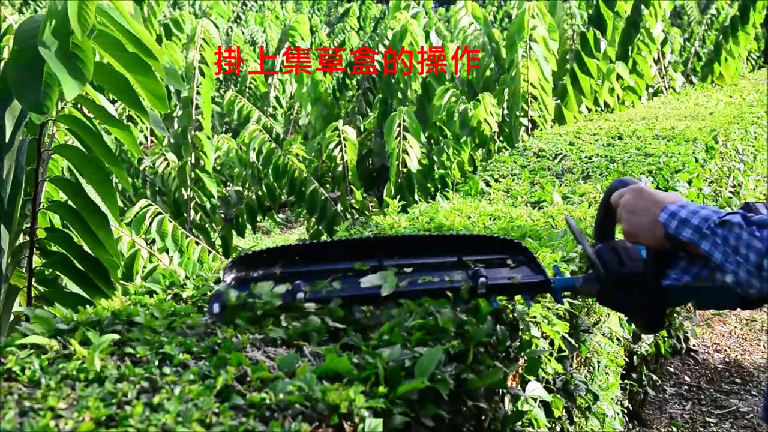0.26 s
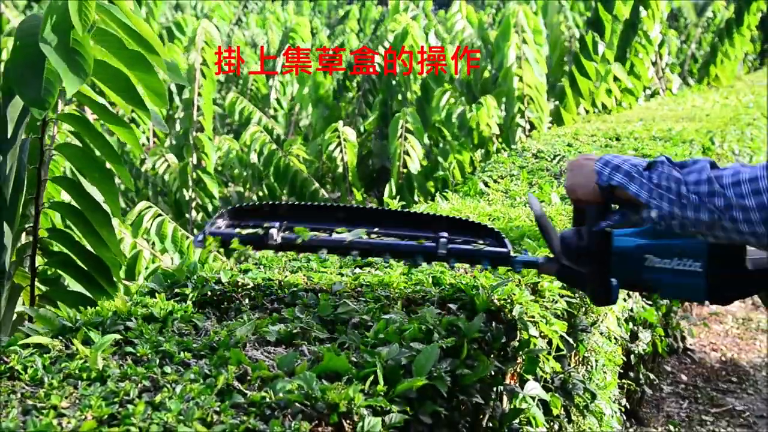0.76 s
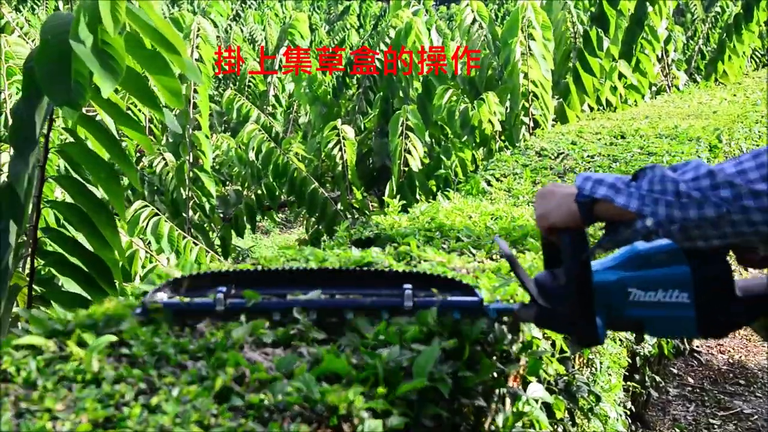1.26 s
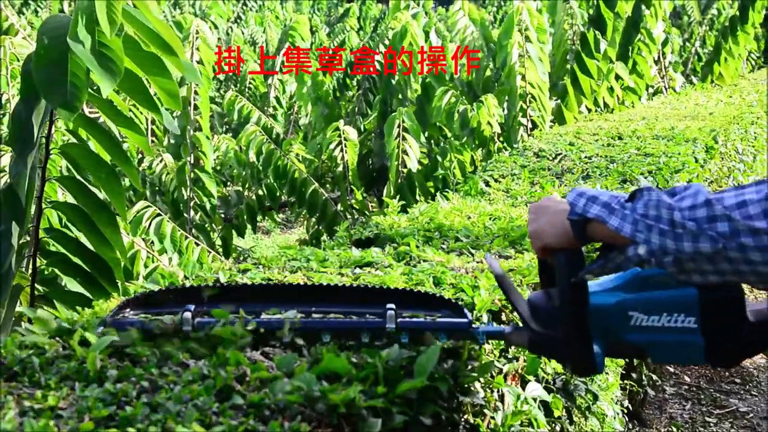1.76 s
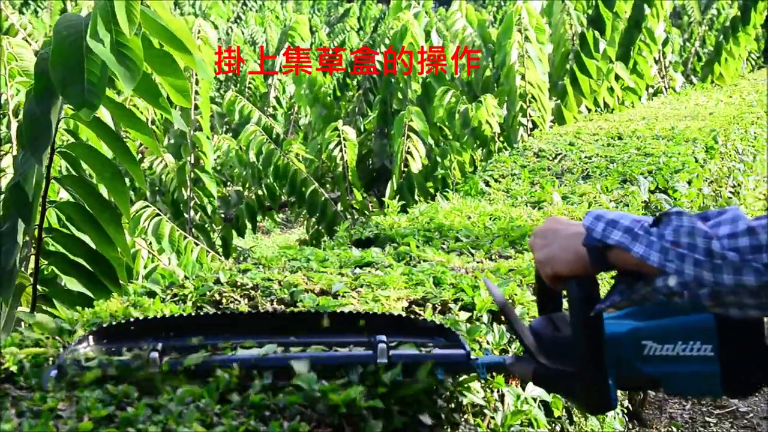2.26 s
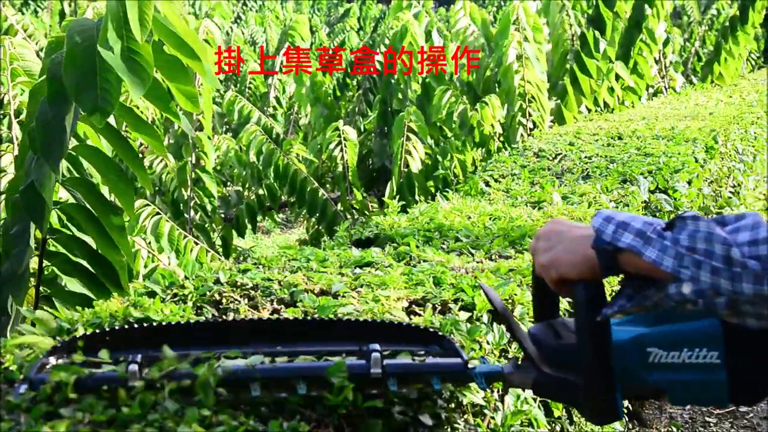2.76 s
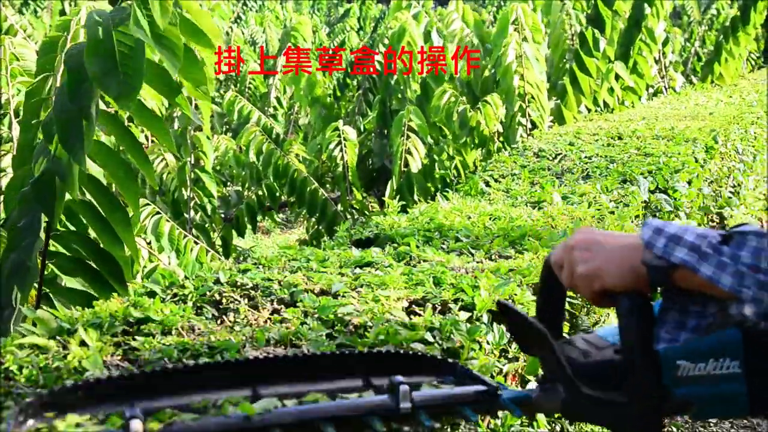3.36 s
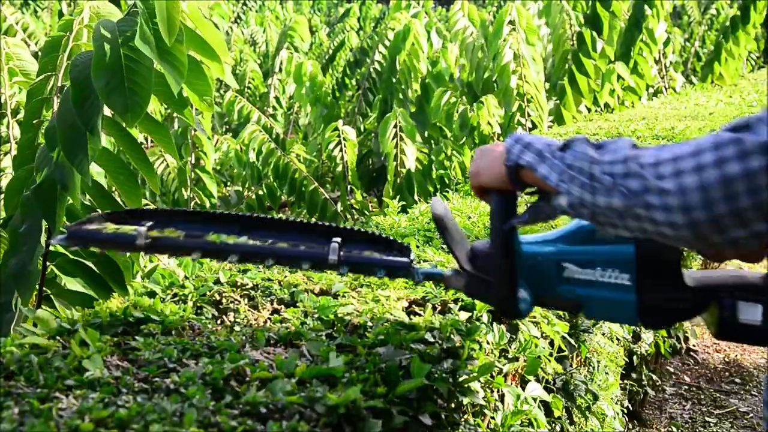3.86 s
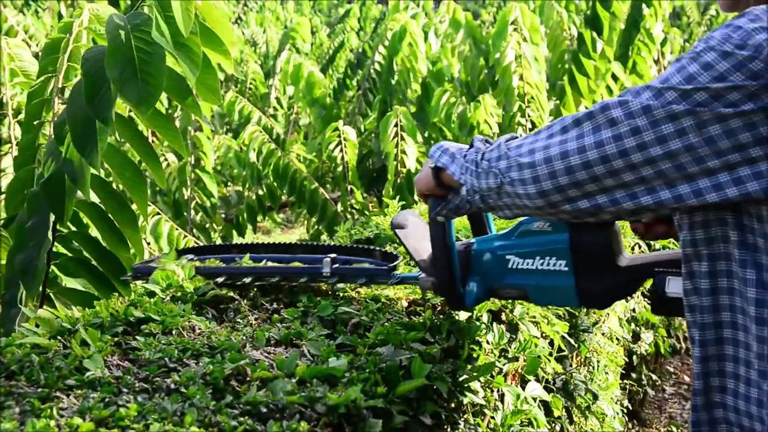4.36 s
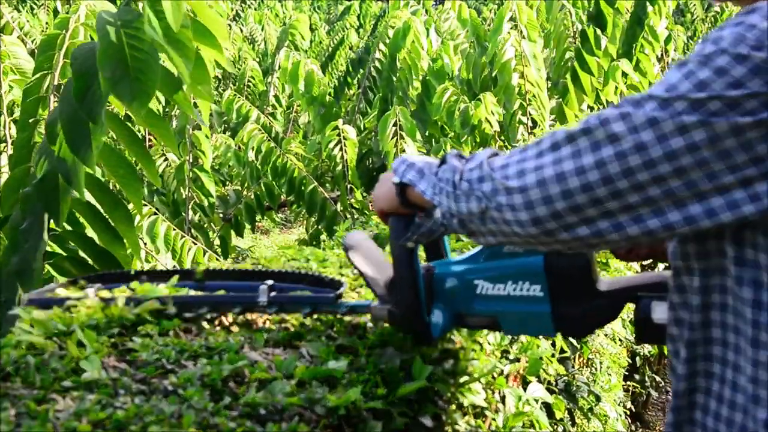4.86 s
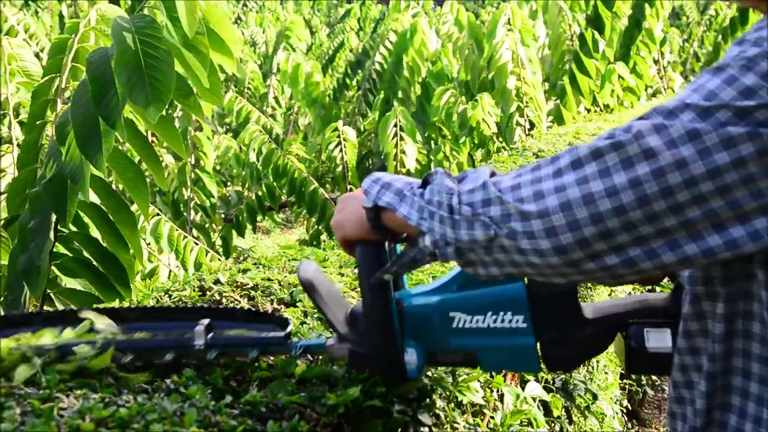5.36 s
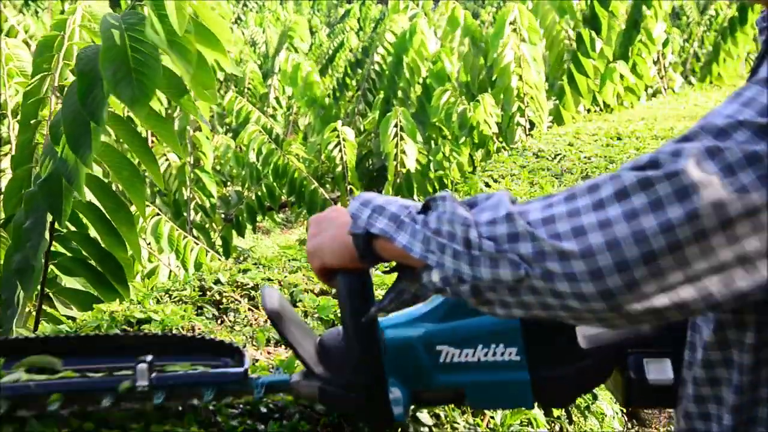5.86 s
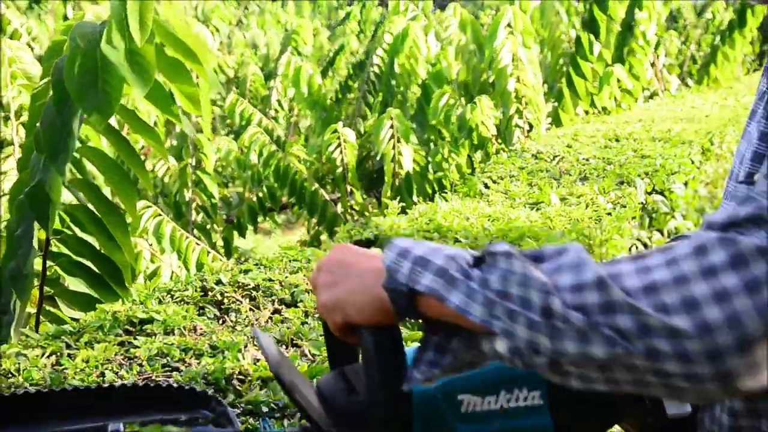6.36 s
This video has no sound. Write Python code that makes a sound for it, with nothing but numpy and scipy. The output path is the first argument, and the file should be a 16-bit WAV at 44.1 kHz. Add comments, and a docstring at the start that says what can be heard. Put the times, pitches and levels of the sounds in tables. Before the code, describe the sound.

After a few clinks, an electric hedge trimmer clatters close by, shearing leaves and snapping twigs, with one short pause midway.

```python
"""Cordless hedge trimmer at work

After a few clinks the trimmer spins up, cuts along a hedge, stops for half a second and cuts on.
Its blades knock at each reversal and rattle in between, gears whine, twigs snap and leaves rustle.
Further off, in a faint wash of open air, a slow single-cylinder engine thumps and gathers speed."""
import sys
import numpy as np
from scipy import signal
from scipy.fft import rfft, irfft
from scipy.io import wavfile
from scipy.ndimage import uniform_filter1d

SR = 44100
rng = np.random.default_rng(int(sys.argv[2]) if len(sys.argv) > 2 else 0)


def transcribe(u):
    """Save the signal u as a 16-bit wav file named by the first command-line argument.

    u: samples, shape (n,) or (channels, n), limited to [-1, 1]; the rate is SR.
    q: integer samples, one column per channel.
    """
    v = np.clip(np.atleast_2d(u).T, -1, 1)
    q = np.round(v * 32767).astype(np.int16)
    wavfile.write(sys.argv[1], SR, q)


N = 291501

# Tone of the blade bar and housing. Each row: frequency in Hz, gain in dB.
BODY_EQ = [(100, -25.5), (220, -24), (330, -17), (450, -13), (700, -13), (1000, -14), (1400, -6),
           (2000, -7), (3000, -4), (3700, -0.5), (4700, 0), (5600, -5.5), (7200, -9), (8400, -13.5),
           (10500, -27.5), (16000, -38)]
# Their resonances. Each row: centre in Hz, width in Hz, boost in dB.
BODY_PEAKS = [(1805, 180, 2.5), (2450, 300, 5), (2900, 420, 0.2), (4000, 160, 0.5), (4800, 510, 0),
              (5660, 400, -1), (6300, 533, 3.5)]


def motor():
    """Each trigger pull spins the motor up at constant power; letting go brakes it evenly."""
    # Trigger held. Each row: pull in seconds, release in seconds.
    trigger = [(.7642, 3.25), (3.7663, 6.7)]
    # One pass over the hedge per pull. Each row: clatter attack in seconds, clatter level in dB,
    # hiss of the full cut in dB relative to that level.
    passes = [(0.059, -17, -9.5), (.16, -17.5, -5.5)]
    # Speed the motor settles at. Each row: time in seconds, full strokes per second.
    settled_speed = [(1.5, 29.352), (3.1, 29.784), (4.3, 29.58)]
    spin_up_s, brake_s, coast_s = .1386, .1074, .0052
    surge_s, surge_db = .19, 4  # the drive shakes hardest a moment after each pull
    entry_db, sink_s = -14, .93  # the hiss starts low and grows as the bar sinks into the foliage
    t = np.arange(N) / SR
    full_speed, = curves(settled_speed)
    speed, surge, shake, cut_db = np.zeros((4, N))
    for (pull, release), (attack_s, db, full_cut_db) in zip(trigger, passes):
        age = np.maximum(t - pull, 0)
        spin_up = np.sqrt(1 - np.exp(-age / spin_up_s))
        brake = np.clip(1 - (t - release) / brake_s, 0, 1)
        speed += full_speed * spin_up * brake
        surge += (age / surge_s * np.exp(1 - age / surge_s)) ** 2
        shake += undb(db) * swell(pull, release + coast_s, attack_s, t60=.21)
        cut_db = np.where(t > pull, full_cut_db + entry_db * np.exp(-age / sink_s), cut_db)
    cut_db += 20 * np.log10(np.maximum(speed / full_speed, .01))  # slow blades shear fewer leaves
    return speed, surge, shake * undb(surge_db * surge), cut_db


def blades(strokes, shake, cut_db):
    """The blades knock with each stroke; loose teeth rattle, then bite and shear after each reversal."""
    # Knocks within one stroke. Each row: position as a share of the stroke, relative level in dB.
    contacts = [(.02, 0), (.06, -6.5), (.1, -22), (.18, -7.5), (.26, -8), (.38, -2), (.54, -5),
                (0.589, -3.5), (.64, -6), (.71, -2.5), (0.801, -2)]
    # Tone of leaves being cut. Each row: frequency in Hz, gain in dB.
    hiss_eq = [(2000, -29.5), (5000, 8), (8300, 2.5), (10500, -8.5), (13000, -18), (16000, -21)]
    sing_hz, sing_width_hz, sing_db = 6490, 190, -28.5
    knocks = 0
    for share, db in contacts:
        hits = undb(db) * pulses(strokes, share, jitter_s=.00022, scatter_db=3)
        knocks += ring(hits, t60=.038, direct=.36)  # each contact point rings in its own way
    sliding = undb(1.1 * np.cos(4 * np.pi * (strokes - .11)))
    loose_teeth = smear(grains(rate=700, spread_db=.5) * sliding, t60=.012)
    rattle = ring(loose_teeth, t60=.045, direct=1.29)
    clatter = unit(colour(unit(knocks) + undb(2.5) * rattle, BODY_EQ, BODY_PEAKS))
    outward = pulses(strokes, .03, jitter_s=.0006, scatter_db=2)
    back = pulses(strokes, .63, jitter_s=.0006, scatter_db=2)
    bite = smear(outward + .6 * back, t60=.048)
    thud = unit(colour(bite, BODY_EQ, [(2360, 410, 11.1), (570, 150, 2.7)]))
    shear = smear(grains(rate=3200, spread_db=5.5) * sliding, t60=.0044)
    hiss = unit(colour(shear + .5 * unit(knocks) + .76 * bite, hiss_eq))
    # thicker growth means both more hiss and a harder bite
    cutting = undb(cut_db) * hiss + undb(1.2 + .85 * cut_db) * thud
    # the blades sing for a while where they rub
    sing = unit(band(band(rattle, sing_hz, sing_width_hz), sing_hz, sing_width_hz))
    rubbing = undb(sing_db) * swell(4.48, 5.6, attack_s=.3, t60=2.6)
    return shake * (undb(-1.57) * clatter + cutting) + rubbing * sing


def gears(strokes, speed, surge):
    """The crank loads the gears twice a stroke, splitting their whine; the shaken housing hums."""
    # Whine as the tool is turned. Each row: time in seconds, mesh gain in dB, octave gain in dB.
    whine_levels = [(1.7, -34, -31), (2.1, -36, -25), (3.2, -37.5, -25.5), (4.4, -31, -28),
                    (5.25, -30, -32), (5.6, -40, -34), (6.3, -36, -28.5)]
    # Partials of the gear mesh. Each row: multiple of the stroke rate, relative level in dB.
    mesh_partials = [(62, -7), (66, 0), (68, -1), (70, -10), (109, -7)]
    # Housing hum. Each row: multiple of the stroke rate, level at top speed in dB.
    hum_partials = [(12, -54), (14, -52.5), (16, -57.5), (18, -53.5), (20, -58)]
    surge_db = 8
    mesh_db, octave_db = curves(whine_levels)
    turn = 2 * np.pi * strokes
    play = .15 * walk(120)
    mesh = sum(undb(db) * np.sin(k * turn + play + rng.uniform(0, 2 * np.pi)) for k, db in mesh_partials)
    backlash = .9 * walk(170)  # roughens the octave of the mesh tone
    octave = np.sin(136 * turn + .56 * np.sin(2 * turn) + backlash) * undb(2.25 * walk(150))
    hum = sum(undb(db + 2.8 * walk(5.5)) * np.sin(k * turn + rng.uniform(0, 2 * np.pi))
              for k, db in hum_partials)
    whine = undb(surge_db * surge) * (undb(mesh_db) * mesh + undb(octave_db) * unit(octave))
    return (whine + hum) * (speed / speed.max()) ** 6  # slow gears are nearly silent


def twigs(strokes, speed, cut_db):
    """Each bite on a twig jolts the blade bar with a short crunch; thick ones can take several strokes."""
    # Thick twigs. Each row: start in seconds, first jolt in dB, strokes needed to cut through.
    thick_twigs = [(.837, -4, 1), (.928, -1.5, 1), (2.2055, 1.5, 1), (2.41, -1, 1), (2.4924, -4, 1),
                   (3.8189, -8, 1), (3.9402, -3, 1), (6.321, -2, 1), (6.3545, 2, 2), (6.438, 2, 3)]
    thin_chance, thin_db = .1, -2  # thin twigs are caught at random, louder the deeper the cut
    rebite_db, crunch_t60_s = -4.5, .045
    caught = rng.random(N) < thin_chance
    jolts = caught * pulses(strokes, .03, jitter_s=.00065, scatter_db=1.5) * undb(thin_db + cut_db)
    for start, db, bites in thick_twigs:
        for k in range(bites):
            add(jolts, start + k / speed[int(start * SR)], undb([db + k * rebite_db]))
    envelope = signal.lfilter([1], [1, -np.exp(-np.log(1000) / (crunch_t60_s * SR))], jolts)
    return colour(envelope * np.tanh(rng.standard_normal(N)), BODY_EQ, BODY_PEAKS)


def blade_clinks():
    """The blade clacks at each strike and rings for a while after, buzzing against its guide; some strikes
    barely ring."""
    # Slack taken up in the blades. Each row: start in seconds, gain in dB, amount of ring from 0 to 1.
    strikes = [(.484, -13, .7), (.4905, -15, .5), (.497, -19, .6), (.532, -24.5, 1), (.6665, -12.5, .03),
               (.673, -10, .03), (.678, -10, .05), (.748, -10, .6)]
    # Bending modes of the blade. Each row: frequency in Hz, relative level in dB, t60 in seconds.
    modes = [(2676, -15, .3), (3335, -16, .35), (3677, -19, .3), (4011, -14, .15), (4339, -6, .2),
             (4660, 0, .25), (4990, -3, .24), (5335, -14, .1), (5669, -19, .1), (6350, -21, .06),
             (7400, -22, .04)]
    out, t = np.zeros(N), np.arange(SR // 2) / SR
    for start, db, ring_amount in strikes:
        buzz = .45 * walk(600)[:len(t)]
        ringing = 0
        for hz, mode_db, t60 in modes:
            phase = 2 * np.pi * hz * t + buzz + rng.normal(0, .66)
            ringing += undb(mode_db) * np.sin(phase) * fade(t60, len(t))
        crack = rng.standard_normal(len(t)) * fade(.0094, len(t))
        clack = band(band(crack, 4600, 680), 4600, 1500)
        clack /= np.abs(clack).max()
        add(out, start, undb(db) * (undb(-2.5) * ring_amount * ringing + undb(2) * clack))
    return signal.sosfilt(signal.butter(3, 9000, fs=SR, output="sos"), out)


def drive_clacks():
    """Play in the drive closes with a dull knock of the housing as it stops and takes up again."""
    # Each row: start in seconds, level of the first 10 ms in dB, t60 in seconds, resonance in Hz.
    knocks = [(3.336, -36, 0.043, 4550), (3.371, -28.5, 0.068, 1400), (3.784, -27, 0.12, 2980)]
    # Tone of the knocked housing. Each row: frequency in Hz, gain in dB.
    housing_eq = [(100, -7), (500, -1), (1000, 1), (3000, -1), (5000, -5), (7000, -21), (16000, -40)]
    out, n = np.zeros(N), SR // 4
    attack = np.minimum(np.arange(n) / SR / .0021, 1)
    for start, db, t60, hz in knocks:
        burst = rng.standard_normal(n) * attack * fade(t60, n)
        knock = colour(burst, housing_eq, [(hz, .37 * hz, 9)])
        onset_rms = np.sqrt(np.mean(knock[:SR // 100] ** 2))
        add(out, start, undb(db) * knock / onset_rms)
    return out


def squeaks():
    """Short, thin squeaks that waver as they glide."""
    # Each row: start in seconds, length in seconds, first pitch in Hz, last pitch in Hz, level in dB.
    glides = [(0.289, .021, 4670, 4000, -28), (.301, .036, 4200, 5150, -34), (.317, .06, 2330, 3200, -42),
              (0.601, 0.045, 3050, 2900, -31), (.624, 0.075, 2790, 2950, -30.5),
              (0.625, .045, 3800, 3500, -31), (.649, 0.061, 3360, 3330, -28),
              (0.697, .061, 3380, 3380, -36), (3.792, .073, 3150, 3200, -22),
              (3.931, 0.024, 4830, 4750, -17)]
    out, waver = np.zeros(N), .04 * walk(770)
    for start, length, first_hz, last_hz, db in glides:
        n = int(length * SR)
        hz = np.linspace(first_hz, last_hz, n) * (1 + waver[int(start * SR):][:n])
        tone = np.sin(2 * np.pi * np.cumsum(hz) / SR)
        add(out, start, undb(db) * tone * signal.windows.tukey(n, .7))
    return out


def dry_crackle():
    """A brief click at the very start, then short swells of dry crackle."""
    # Each row: start in seconds, length in seconds, level in dB, centre of a broad boost in Hz.
    bursts = [(0, 0.036, -32, 3620), (0.083, 0.29, -43.5, 4720), (0.214, .058, -38.5, 3000),
              (0.48, 0.079, -36, 2370), (0.672, 0.062, -37.5, 1500), (3.28, 0.64, -49.5, 4800),
              (3.651, 0.049, -33.5, 2300)]
    crackle_eq = [(100, -14), (400, -.5), (5000, -3), (8000, -12), (16000, -35)]
    out, crackle = np.zeros(N), smear(grains(rate=2300, spread_db=4.5), t60=.0033)
    for start, length, db, hz in bursts:
        n = int(length * SR)
        burst = colour(crackle[int(start * SR):][:n], crackle_eq, [(hz, hz, 8)])
        add(out, start, undb(db) * unit(burst * signal.windows.tukey(n, .4)))
    return out


def far_engine():
    """Each firing thumps the exhaust and puffs gas, as hard as the throttle is set; a dull echo follows."""
    # Engine speed. Each row: time in seconds, firings per second.
    firing_rate = [(0.0, 5.84), (0.7, 5.85), (1.3, 7.26), (2.0, 9.14), (2.65, 10.45), (3.35, 9.8),
                   (4.0, 11.56), (4.5, 12.8), (4.85, 13.52), (6.61, 13.8)]
    # Throttle settings, each held until the next. Each row: start in seconds, level in dB.
    throttle = [(0, -50.5), (.78, -45), (2.68, -55), (3.34, -35), (4.15, -40), (5.1, -45.5)]
    # Exhaust resonances. Each row: centre in Hz, width in Hz, gain in dB.
    exhaust_modes = [(55.7, 8.3, -15), (71.6, 17, 15), (100, 22, 3.5), (126, 18, -14), (190, 90, -20)]
    # Tone of the gas and valve noise. Each row: frequency in Hz, gain in dB.
    puff_eq = [(100, 0.5), (300, 2), (700, 3.5), (1300, 0), (2200, -18), (5000, -34), (16000, -49)]
    ease_s, echo_s = .17, .052
    rate, = curves(firing_rate)
    level_db = np.zeros(N)
    for start, db in throttle:
        level_db[int(start * SR):] = db
    level_db = uniform_filter1d(level_db, int(ease_s * SR))
    cycles = np.cumsum(rate) / SR - .12
    firing = pulses(cycles, 0, jitter_s=.00054, scatter_db=1.1) / np.sqrt(rate)
    pipe = sum(undb(db) * band(firing, hz, width) for hz, width, db in exhaust_modes)
    thump = signal.sosfilt(signal.butter(3, [42, 150], "band", fs=SR, output="sos"), pipe)
    echo = np.pad(band(thump, 61, 43), (int(echo_s * SR), 0))[:N]
    gas_flow = .26 + np.exp(-(cycles % 1) / .32)
    puff = colour(rng.standard_normal(N) * gas_flow, puff_eq)
    return undb(level_db) * (unit(thump + .91 * echo) + undb(-4) * unit(puff))


def open_air():
    """A faint outdoor wash that swells slowly, with one short low rumble."""
    # Tone of the wash. Each row: frequency in Hz, gain in dB.
    air_eq = [(25, -19), (60, 6.5), (150, -8), (300, -9.5), (1000, -7.5), (2000, -13), (4700, -10),
              (7000, -20.5), (10000, -29), (16000, -38)]
    wash = undb(-44) * unit(colour(rng.standard_normal(N), air_eq)) * undb(3.9 * walk(5.87))
    rumble = unit(band(band(rng.standard_normal(N), 147, 123), 150, 130))
    return wash + undb(-39.5) * swell(4.5, 4.76, attack_s=.22, t60=.45) * rumble


def undb(db):
    """Decibels to gain."""
    return 10 ** (np.asarray(db) / 20)


def unit(x):
    """Scale to an rms of 1."""
    return x / np.sqrt(np.mean(x ** 2) + 1e-20)


def curves(table):
    """Automation lines: each column after the first, ramped between the times in the first."""
    times, *columns = np.transpose(table)
    return [np.interp(np.arange(N) / SR, times, column) for column in columns]


def walk(rate):
    """Smooth random drift with an rms of 1 and `rate` new targets a second."""
    step = max(int(SR / rate), 1)
    held = np.repeat(rng.standard_normal(N // step + 1), step)
    return unit(uniform_filter1d(uniform_filter1d(held, step), step)[:N])


def colour(x, points, peaks=()):
    """Minimum-phase EQ through (Hz, dB) points with (Hz, width in Hz, dB) resonances on top."""
    size = 4096
    hz = np.maximum(np.arange(size // 2 + 1) * SR / size, 1)
    point_hz, point_db = np.transpose(points)
    db = np.interp(np.log(hz), np.log(point_hz), point_db)
    db += sum(boost / (1 + (2 * (hz - centre) / width) ** 2) for centre, width, boost in peaks)
    cepstrum = irfft(np.log(undb(db)))
    cepstrum[1:size // 2] *= 2  # folded forward, so nothing rings ahead of a hit
    cepstrum[size // 2 + 1:] = 0
    return signal.fftconvolve(x, irfft(np.exp(rfft(cepstrum))))[:len(x)]


def band(x, hz, width):
    """One resonance, gain 1 at its centre."""
    return signal.lfilter(*signal.iirpeak(hz, hz / width, fs=SR), x)


def fade(t60, count):
    """Exponential decay, 60 dB down after t60 seconds."""
    return np.exp(-np.log(1000) * np.arange(count) / SR / t60)


def swell(start, end, attack_s, t60):
    """Even rise from start, hold until end, then an exponential fall."""
    t = np.arange(N) / SR
    return np.clip((t - start) / attack_s, 0, 1) * np.exp(-np.log(1000) * np.maximum(t - end, 0) / t60)


def ring(x, t60, direct):
    """Crowded plate modes: a sharp crack followed by a noisy decay."""
    tail = rng.standard_normal(4096) * fade(t60, 4096)
    tail /= np.linalg.norm(tail)
    tail[0] += direct
    return signal.fftconvolve(x, tail / np.linalg.norm(tail))[:N]


def smear(x, t60):
    """Each click becomes its own short burst of noise."""
    energy = signal.lfilter([1], [1, -np.exp(-2 * np.log(1000) / (t60 * SR))], x ** 2)
    return unit(np.sqrt(energy) * rng.standard_normal(N))


def pulses(turns, share, jitter_s, scatter_db):
    """One pulse a turn at a given share of it, uneven in time and size."""
    at = np.flatnonzero(np.diff(np.floor(turns - share)) > 0)
    timing, size = rng.standard_normal((len(at), 2)).T
    at = np.clip(at + (jitter_s * SR * timing).astype(int), 0, N - 1)
    return np.bincount(at, undb(scatter_db * np.clip(size, -2, 2)), N)


def grains(rate, spread_db):
    """Random tiny clicks, about `rate` a second; a wide spread makes a few stand out."""
    size = undb(spread_db * np.minimum(rng.exponential(size=N), 4))
    return (rng.random(N) < rate / SR) * size * rng.choice([-1, 1], N)


def add(out, start, sound):
    """Mix a sound in at `start` seconds."""
    i = max(int(start * SR), 0)
    out[i:i + len(sound)] += sound[:max(N - i, 0)]


def scene():
    """The trimmer close by, the engine and the open air behind it, in mono."""
    speed, surge, shake, cut_db = motor()
    strokes = np.cumsum(speed) / SR
    running = blades(strokes, shake, cut_db) + gears(strokes, speed, surge)
    running += twigs(strokes, speed, cut_db)
    small_sounds = blade_clinks() + drive_clacks() + squeaks() + dry_crackle()
    return (running + small_sounds + far_engine() + open_air())[None]


def record(dry):
    """The microphone rounds the highest peaks; a steep low-pass cuts the top."""
    top_hz = 15800
    rounded = 1.44 * np.tanh(dry / 1.354)
    return signal.sosfilt(signal.ellip(10, .2, 80, top_hz, fs=SR, output="sos"), rounded)


dry = scene()
out = record(dry)
transcribe(out)
```